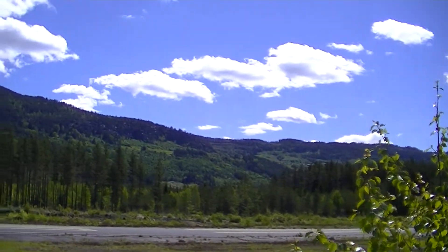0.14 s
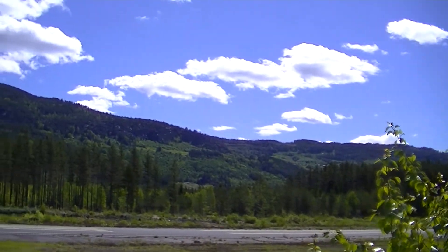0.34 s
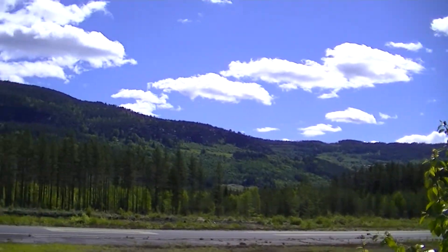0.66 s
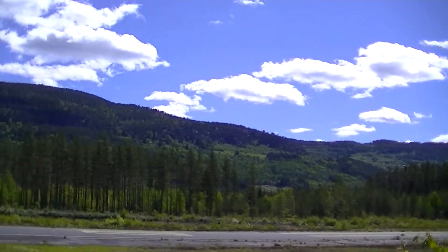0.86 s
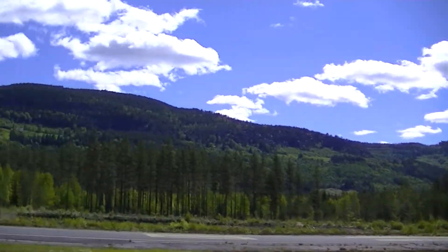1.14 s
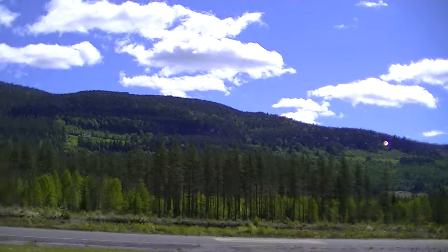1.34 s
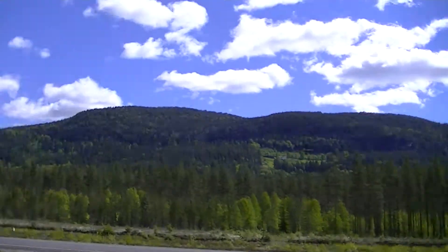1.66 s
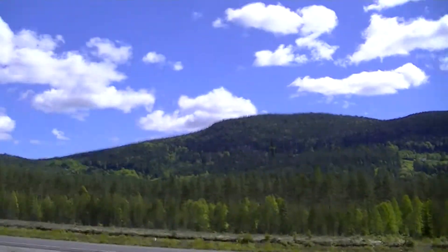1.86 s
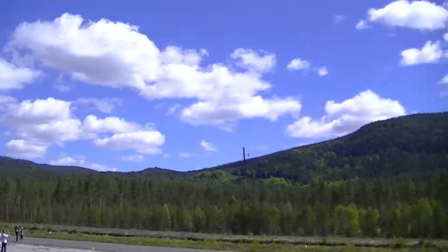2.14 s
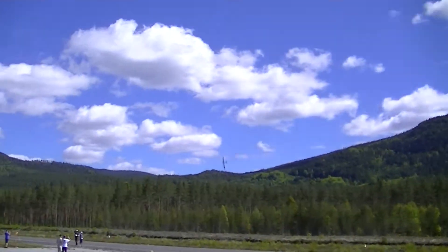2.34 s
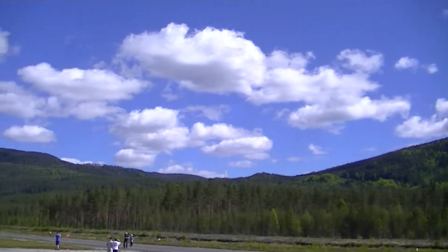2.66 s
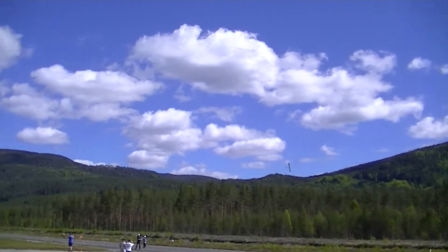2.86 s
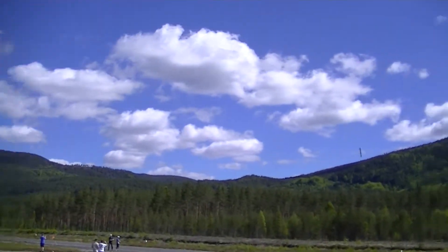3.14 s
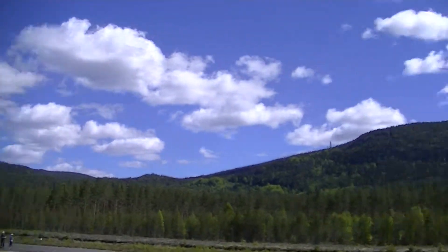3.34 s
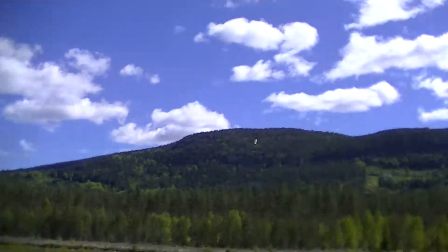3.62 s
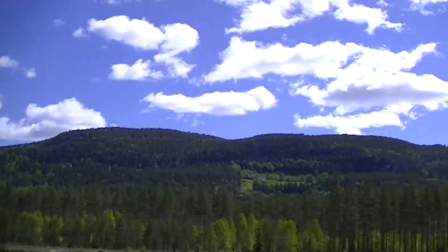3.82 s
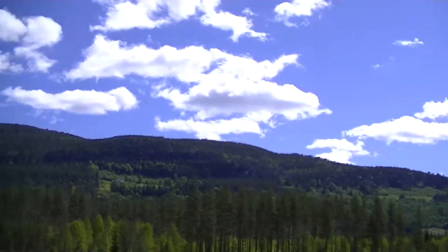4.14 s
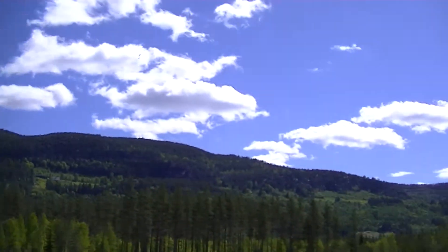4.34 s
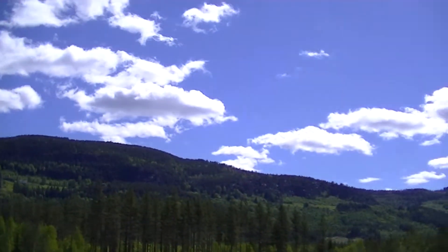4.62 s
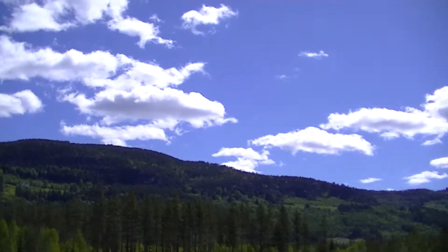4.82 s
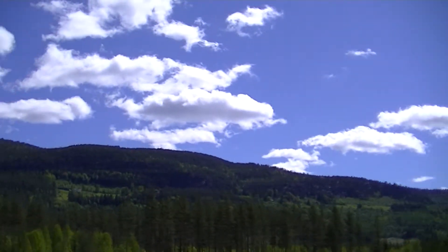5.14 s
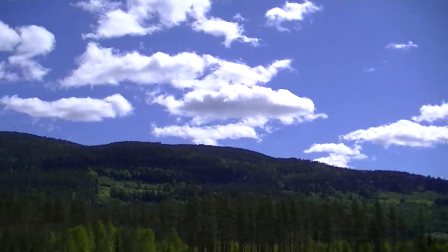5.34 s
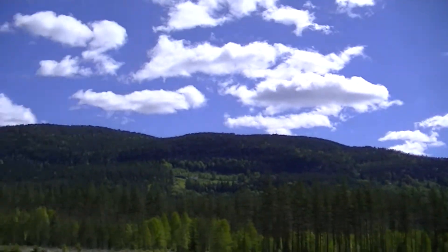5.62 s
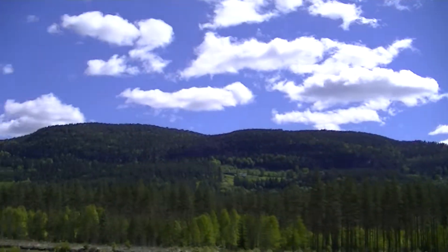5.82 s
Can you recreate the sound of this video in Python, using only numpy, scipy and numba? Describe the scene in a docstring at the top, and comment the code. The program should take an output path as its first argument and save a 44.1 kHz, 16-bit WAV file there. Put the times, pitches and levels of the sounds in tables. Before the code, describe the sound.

Outdoors on an open airfield, a small model jet turbine starts quiet and distant, swells over two seconds into a broad, rushing roar with a thin whine sliding down, peaks around two and a half seconds, then eases but keeps hissing unevenly as it turns away and comes back. Hollow phasing sweeps through it. A handheld camera's close stereo microphone hears it from afar.

```python
"""Airfield: a model jet flies past, turns far out over the runway and climbs away on its way back.
Exhaust: noise in overlapping bands with gliding levels, flickering most in the treble.
Turbine: a thin whine with its octave and a fainter, higher whistle, bent by Doppler shift and throttle.
Delayed reflections off the ground and a near surface comb the rush into hollow, sweeping phasing.
A faint hum and a trace of low outdoor noise lie beneath."""
import sys
import numpy as np
from scipy import signal
from scipy.fft import rfft, irfft
from scipy.io import wavfile
from scipy.ndimage import uniform_filter1d, map_coordinates
from numba import njit

SR = 44100
rng = np.random.default_rng(int(sys.argv[2]) if len(sys.argv) > 2 else 0)


def store_wav(level_fs):
    """Save 16-bit WAV to argv[1]."""
    pcm = np.round(np.clip(np.atleast_2d(level_fs), -1, 1) * 32767)
    wavfile.write(sys.argv[1], SR, pcm.T.astype(np.int16))


N = 263718

# mean exhaust spectrum: [f/Hz, relative density/dB]
EXHAUST_COLOUR = [(100, -57), (180, -36), (290, -13), (400, -8.5), (490, -12), (660, -2.5), (1150, -3),
                  (1650, -1.5), (2900, -4), (4200, -7.5), (6000, -11), (8500, -15.5), (10500, -23.5),
                  (12500, -33), (15000, -49.5)]
# slow relative levels of four exhaust parts: [t/s, roar/dB, rush/dB, hiss/dB, sizzle/dB]
PASS_LEVELS = [(0.0, -39.5, -35, -42.5, -55), (0.12, -34.5, -37.5, -39.5, -59),
               (0.45, -33.5, -29, -29.5, -44), (0.85, -31, -29, -27.5, -43.5),
               (1.35, -24.5, -22, -22, -26.5), (1.85, -17.5, -17.5, -17.5, -21.5),
               (2.1, -17.5, -15.0, -21.5, -28.5), (2.45, -20, -11, -17.5, -27), (2.8, -21, -15, -25.5, -24),
               (3.1, -22, -21.5, -24.5, -20.5), (3.4, -20, -21.5, -25.5, -30.5), (3.85, -22, -22, -22, -25),
               (4.45, -27.5, -22.5, -26.5, -29), (4.85, -22, -19.0, -22.5, -26.0),
               (5.4, -26.5, -19.5, -23.5, -28), (5.98, -24, -21, -23, -27.5)]


def undb(db):
    """Decibels to gain."""
    return 10 ** (np.asarray(db) / 20)


def curves(table):
    """Table columns, linearly interpolated over time."""
    s, *columns = np.transpose(table)
    t = np.arange(N) / SR
    return [np.interp(t, s, column) for column in columns]


def unit(x):
    """Scale to rms 1."""
    return x / np.sqrt(np.mean(x ** 2))


def response(points):
    """Gain per frequency bin from (f/Hz, gain/dB) points, linear in log frequency."""
    hz, db = np.transpose(points)
    log_hz = np.log(np.fft.rfftfreq(N, 1 / SR) + 1)
    return undb(np.interp(log_hz, np.log(hz), db))


def colour(x, points):
    """Zero-phase filter through (f/Hz, gain/dB) points."""
    return irfft(rfft(x) * response(points), N)


def walk(rate_hz):
    """Smooth random curve of rms 1 with rate_hz fresh values per second."""
    steps = rng.standard_normal(N // 4)
    return unit(np.interp(np.arange(N) / SR * rate_hz, np.arange(len(steps)), steps))


def swell(db):
    """Level curve relative to its mean power."""
    return db - 10 * np.log10(np.mean(undb(db) ** 2))


def bump(s, half_s):
    """Gaussian rise to 1 and fall, centred on time s."""
    return np.exp(-((np.arange(N) / SR - s) / half_s) ** 2)


def hum():
    """Faint wavering hum lines over low outdoor noise that differs partly between the ports."""
    # hum lines, before the slow rise: [f/Hz, level/dB]
    hum_lines = [(62, -79.5), (124, -81.5)]
    t = np.arange(N) / SR
    lines = 0
    for hz, db in hum_lines:
        lines = lines + undb(db) * unit(np.sin(2 * np.pi * hz * t + .3 * walk(6)))
    noise = rng.standard_normal(N) + 0.3 * rng.standard_normal((2, N))  # shared + per port
    air = unit(colour(noise, [(20, -12), (90, -12), (200, -0.5), (1000, -21), (8000, -60)]))
    rise_db = np.interp(t, [0, 6], [-3, 3])
    return (lines + undb(-66.5) * air) * undb(rise_db)


def unshared_noise(jet):
    """Noise that differs between the ports and follows the jet's loudness."""
    # filter for the noise: [f/Hz, gain/dB]
    unshared_gain = [(200, -46), (1000, -29), (2500, -21.5), (7000, -29), (13000, -78)]
    loudness = np.sqrt(np.abs(uniform_filter1d(jet ** 2, size=2048)))
    noise = unit(colour(rng.standard_normal(N), EXHAUST_COLOUR))
    return loudness * colour(noise, unshared_gain)


def air_shimmer():
    """Treble level in dB: random flicker, plus small eddies that briefly focus or scatter it."""
    # eddy flares: [t/s, half length/s, level/dB]
    flares = [(0.44, 0.016, 6.0), (0.645, 0.027, 3.5), (0.935, 0.026, 6), (1.048, 0.017, 9.5),
              (1.085, 0.0098, -4.5), (1.16, 0.012, 4.5), (1.332, 0.0065, 2.5), (1.613, 0.011, -5),
              (3.256, 0.014, 4.5), (3.409, 0.019, 7.5), (3.772, 0.044, 3.5), (3.85, 0.01, -7),
              (3.987, 0.0057, 8), (4.288, 0.012, 6.5), (4.385, 0.013, 3.5), (5.067, 0.041, 2.5),
              (5.684, 0.033, 6), (5.847, 0.033, 6), (5.933, 0.016, 5.5)]
    return 1.06 * walk(55) + sum(db * bump(s, half_s) for s, half_s, db in flares)


def tone(hz, wander_hz, wander_rate_hz=220, flutter_db=4.0):
    """Blade tone of rms 1, blurred in pitch and level by the turbulent path."""
    phase = 2 * np.pi * np.cumsum(hz + wander_hz * walk(wander_rate_hz)) / SR
    return unit(np.sin(phase) * undb(flutter_db * walk(70)))


def whine(shimmer_db):
    """Spinning turbine: tone, octave and a thin higher whistle with gliding pitches."""
    # turbine tone, before fades and shimmer: [t/s, f/Hz, level/dB]
    turbine_track = [(0, 5075, -50), (.45, 5155, -38.5), (.8, 5105, -37), (1.18, 4940, -31),
                     (1.48, 4620, -29), (1.75, 4170, -24), (2.1, 3850, -42), (2.85, 3940, -42),
                     (3.19, 3790, -39), (3.26, 4000, -28), (3.41, 4290, -36), (3.76, 4235, -32),
                     (4.08, 4135, -35), (4.5, 3855, -42), (4.98, 3800, -27), (5.55, 3735, -34),
                     (5.98, 3670, -48)]
    # fades and flares of the tone: [t/s, half length/s, level/dB]
    fades = [(.62, .04, 4), (.76, .06, -7), (1.27, .04, -15), (1.55, .025, -9), (1.68, .05, 4),
             (3.17, .04, -5), (3.26, .02, 3), (3.5, .04, -5), (3.88, .03, -6), (4.3, .08, -9),
             (5.13, .03, -8)]
    # whistle, before shimmer: [t/s, f/Hz, level/dB]
    whistle_track = [(0, 7360, -70), (.3, 7530, -67), (.55, 7560, -62), (.8, 7500, -70), (4.7, 4300, -69),
                     (4.93, 4440, -38), (5.1, 4420, -33.5), (5.3, 4360, -38), (5.6, 4200, -50),
                     (5.98, 4270, -65)]
    hz, db = curves(turbine_track)
    db = db + sum(depth_db * bump(s, half_s) for s, half_s, depth_db in fades)
    whistle_hz, whistle_db = curves(whistle_track)
    sizzle_db = curves(PASS_LEVELS)[-1]
    octave_db = -13 + swell(sizzle_db)  # relative to the whine
    turbine = tone(hz, wander_hz=20.9)
    turbine = turbine + tone(2 * hz, wander_hz=71.7) * undb(octave_db)
    whistle = tone(whistle_hz, wander_hz=64) * undb(whistle_db)
    return (turbine * undb(db) + whistle) * undb(shimmer_db / 2)


def reflect(x, lag_ms, turn_rad, dull_hz, firm_hz=650):
    """Late copy off a soft, rough surface: firm for bass, phase turned above, treble absorbed."""
    hz = np.fft.rfftfreq(N, 1 / SR)
    softness = 1 - np.exp(-(hz / firm_hz) ** 2)
    surface = np.exp(1j * turn_rad * softness) / np.sqrt(1 + (hz / dull_hz) ** 2)
    copy = irfft(rfft(x) * surface, N)
    return map_coordinates(copy, [np.arange(N) - lag_ms * SR / 1000], order=3, mode="reflect")


def phasing(x, ground_share=.3, second_share=.36, near_share=.33):
    """Lags slide with the aircraft's height and range, sweeping comb notches through the rush."""
    # extra travel time of the ground reflection, grows with elevation: [t/s, lag/ms]
    ground_lag = [(0, 2.36), (.25, 1.91), (.5, 1.86), (.7, 2.29), (.9, 2.49), (1.3, 2.36), (1.8, 2.66),
                  (2.1, 2.7), (2.45, 2.22), (2.8, 1.72), (3.05, 1.67), (3.6, 2.53), (4.25, 3.12),
                  (4.5, 3.81), (4.7, 4.62), (5.08, 5.15), (5.55, 6.41), (5.98, 6.6)]
    # extra travel time off a surface close by: [t/s, lag/ms]
    near_lag = [(0, 1.18), (1.7, 1.21), (2.3, 1.29), (4.4, 1.27), (5, 1.59), (5.98, 1.64)]
    ground_ms, = curves(ground_lag)
    near_ms, = curves(near_lag)
    second = second_share * bump(2.68, half_s=1.83)  # second bounce, while the aircraft is lowest
    bounces = ground_share * reflect(x, ground_ms, turn_rad=-1.62, dull_hz=6000)
    bounces = bounces + second * reflect(x, ground_ms + .81, turn_rad=-0.041, dull_hz=4000)
    x = (x + bounces) / np.sqrt(1 + ground_share ** 2 + second ** 2)
    near = near_share * reflect(x, near_ms, turn_rad=0.077, dull_hz=3700)
    return (x + near) / np.sqrt(1 + near_share ** 2)


@njit
def band_pass(x, hz, sharpness):
    """State-variable band-pass with a moving centre, gain 1 there."""
    y, band, low, damping = np.empty(len(x)), 0., 0., 1 / sharpness
    for i in range(len(x)):
        g = np.tan(np.pi * hz[i] / SR)
        v = (band + g * (x[i] - low)) / (1 + g * (g + damping))
        band, low = 2 * v - band, low + 2 * g * v
        y[i] = damping * v
    return y


def bell(x, table, sharpness):
    """Lift or scoop one gliding band."""
    hz, db = curves(table)
    return x + (undb(db) - 1) * band_pass(x, hz, float(sharpness))


def vowel(x):
    """The nozzle beams some bands at the listener and turns others away, by angle."""
    # gliding bright band, then two hollows: [t/s, centre f/Hz, gain/dB]
    bright = [(0, 2520, 1), (1.8, 2760, 2.5), (2.4, 2900, 6), (2.75, 2920, 3), (2.98, 2720, 6),
              (3.3, 2920, 6), (3.6, 2480, -3), (3.95, 2280, 9.5), (4.3, 2310, 3.5), (5.1, 1930, 4),
              (5.98, 1830, -3)]
    low_hollow = [(0, 2130, 1), (.6, 2200, -2), (1.9, 2170, 2), (2.6, 2640, -12), (3.1, 2560, -1.5),
                  (3.9, 2740, -1.5), (4.6, 2670, 2), (5.3, 2410, -10), (5.98, 2420, -3)]
    high_hollow = [(0, 5950, 1.5), (1.7, 6100, -4), (2.4, 4900, 1), (3.3, 3900, 0.5), (3.8, 3930, -12),
                   (4.4, 3730, -6.5), (5.1, 4080, -1.5), (5.98, 3900, -4.5)]
    x = bell(x, bright, sharpness=17)
    x = bell(x, low_hollow, sharpness=17)
    return bell(x, high_hollow, sharpness=4.8)


def exhaust(shimmer_db, level_db=-18.0, flicker_db_at_6khz=1.67, crackle_db_at_6khz=0.7,
            crackle_rate_hz=900, hiss_hz=4100, sizzle_hz=6500, surge_octaves=1.07):
    """Turbulent mixing noise: each eddy size has its own beam; the air flickers short waves most."""
    # air absorption of the very top with distance: [t/s, level re sizzle/dB]
    air_top = [(0, 2), (.7, -1.5), (1.2, 7), (2.2, 5), (2.6, -8), (2.9, -2), (3.3, -5.5), (4.9, -4.5),
               (5.98, -16)]
    # lowest rumble: [t/s, level re roar/dB]
    rumble_level = [(0, 2.5), (.9, 1.5), (2.3, 2), (2.9, -3), (3.9, 2), (5.98, -3)]
    # large eddies make a region surge or sink: [t/s, half length/s, level/dB, centre f/Hz]
    surge_table = [(0.228, .049, 5.5, 2900), (.62, 0.058, 5.5, 2700), (.705, 0.027, -8.5, 4500),
                   (1.666, .037, 2, 3080), (2.406, .045, -5, 8100), (2.607, 0.074, 4.5, 5600),
                   (2.717, .03, -1.5, 2200), (2.901, 0.073, -14.5, 7400), (2.99, 0.08, 6.5, 2100),
                   (3.12, 0.026, 2.5, 2000), (3.98, .04, 0.5, 2300), (4.225, .055, -5, 3800),
                   (4.323, 0.036, 5.5, 680), (4.532, .031, -6, 1400), (4.767, .027, 6, 4650),
                   (4.84, 0.013, 4, 650), (4.959, .05, 6, 2500), (5.137, .031, -9.5, 4300),
                   (5.578, .035, -4.5, 7900)]
    roar, rush, hiss, sizzle = curves(PASS_LEVELS)
    top, = curves(air_top)
    rumble, = curves(rumble_level)
    levels = (roar + rumble, roar, rush, hiss, sizzle, sizzle + top)
    beams_db = np.array([swell(db) for db in levels])
    beam_log_hz = np.log([380, 850, 2000, hiss_hz, sizzle_hz, 11000])
    surges_db = np.array([db * bump(s, half_s) for s, half_s, db, hz in surge_table])
    surge_hz = np.array(surge_table)[:, 3]

    bands = np.linspace(np.log(150), np.log(15000), 18)  # log Hz
    log_hz = np.log(np.fft.rfftfreq(N, 1 / SR) + 1)
    noise = rfft(unit(colour(rng.standard_normal(N), EXHAUST_COLOUR)))
    crackle = crackle_db_at_6khz * walk(crackle_rate_hz)  # gas leaves the nozzle in ragged puffs
    out, eddy = 0, walk(54)
    for centre, pick in zip(bands, np.eye(len(bands))):
        band = irfft(noise * np.interp(log_hz, bands, pick), N)
        beam_weights = np.array([np.interp(centre, beam_log_hz, w) for w in np.eye(len(beams_db))])
        octaves_off = np.log2(np.exp(centre) / surge_hz)
        surge_weights = np.exp(-(octaves_off / surge_octaves) ** 2)
        db = beam_weights @ beams_db + surge_weights @ surges_db
        eddy = unit(eddy + 2.5 * walk(50))  # neighbouring bands share some flicker
        shortness = min(np.exp(centre) / 6000, 1.2) ** 0.87
        flicker = shimmer_db + flicker_db_at_6khz * eddy + crackle
        out = out + band * undb(db + shortness * flicker)
    return out * undb(level_db)


def microphone_ports(jet, unshared):
    """Two close ports: own colour, gliding balance, unshared noise in opposite polarity."""
    # balance over time: [t/s, left minus right/dB]
    balance = [(0, -0.4), (1.25, -0.16), (2.5, 1.65), (3.75, 2), (5.98, 2.1)]
    # difference in port colour: [f/Hz, left minus right/dB]
    port_colour = [(250, -1.5), (900, -1.5), (2000, -2.3), (4200, -0.9), (8000, -2.5), (13000, -1.5)]
    pan_db, = curves(balance)
    ports = []
    for side in (1, -1):
        heard = colour(jet, [(hz, side * db / 2) for hz, db in port_colour])
        ports.append(heard * undb(side * pan_db / 2) + side * unshared)
    return np.array(ports)


def scene():
    """Exhaust and whine reach two microphone ports through moving air, over the hum."""
    shimmer_db = air_shimmer()
    jet = phasing(vowel(exhaust(shimmer_db))) + whine(shimmer_db)
    # high-pass at 140 Hz keeps the jet's flicker from spilling into the bass
    jet = signal.sosfilt(signal.butter(4, 140, "highpass", fs=SR, output="sos"), jet)
    return microphone_ports(jet, unshared_noise(jet)) + hum()


def record(dry):
    """Steep elliptic low-pass cuts the top."""
    top_hz = 15600
    return signal.sosfilt(signal.ellip(10, .1, 80, top_hz, fs=SR, output="sos"), dry)


dry = scene()
out = record(dry)
store_wav(out)
```